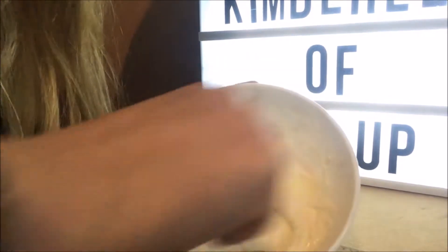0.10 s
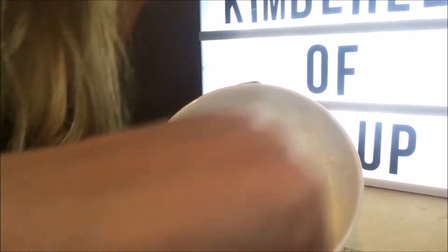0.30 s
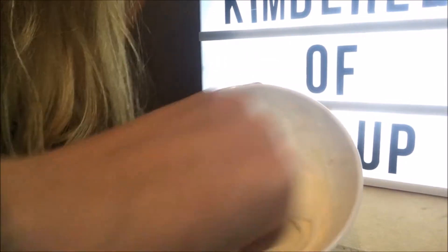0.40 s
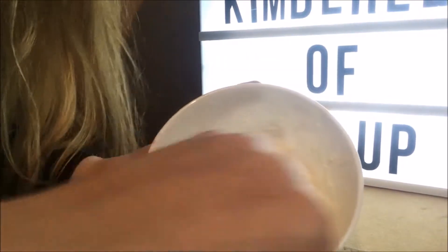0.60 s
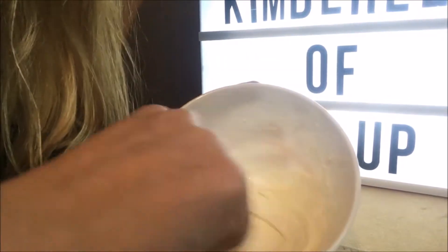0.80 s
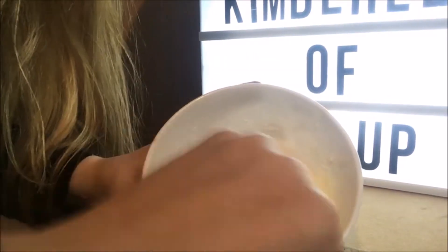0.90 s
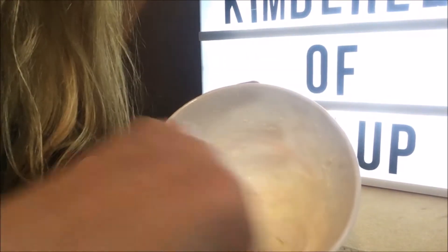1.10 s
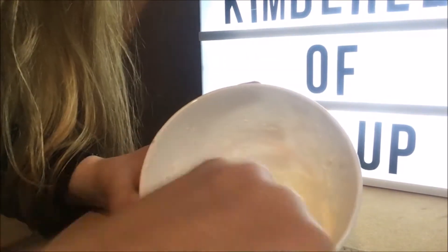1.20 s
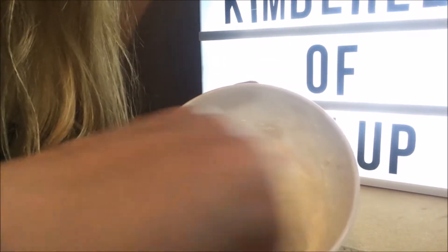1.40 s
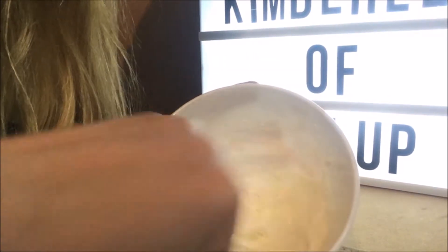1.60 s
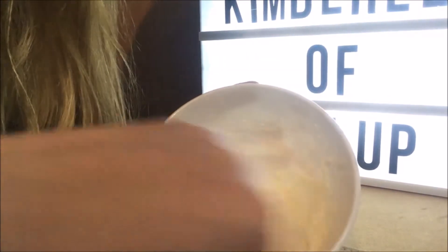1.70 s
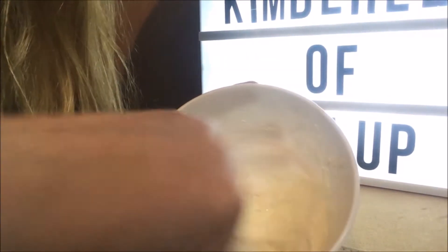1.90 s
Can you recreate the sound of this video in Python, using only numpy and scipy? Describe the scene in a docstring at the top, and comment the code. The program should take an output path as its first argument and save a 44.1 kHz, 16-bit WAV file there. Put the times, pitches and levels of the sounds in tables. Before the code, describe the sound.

A hand works thick gooey paste near the microphone, with irregular wet pops and squelches for just over a second, then only faint sticky clicks and tiny high tinks over low room noise.

```python
"""A small room, microphone close to a plastic bowl in which a hand kneads thick wet slime.
Trapped air pockets burst as wet pops: a cavity resonance with a crack and a ragged noise snap.
Air squeezes through the paste in short fizzing squelches, made of random grains through resonances.
The bowl bumps softly on the table as falling sine tones; sticky ticks of resonant noise and
faint high tinks of ringing modes fill the pauses, over quiet filtered room noise."""
import sys
import numpy as np
from scipy import signal
from scipy.fft import rfft, irfft, next_fast_len
from scipy.io import wavfile
from scipy.ndimage import map_coordinates

SR = 44100
rng = np.random.default_rng(int(sys.argv[2]) if len(sys.argv) > 2 else 0)


def put_to_file(sound):
    """Save the sound as 16-bit audio at rate SR, in the file named by the first command-line argument."""
    columns = np.atleast_2d(sound).T  # one column per channel
    safe = np.clip(columns, -1, 1)
    whole_steps = np.round(safe * 32767)
    wavfile.write(sys.argv[1], SR, whole_steps.astype(np.int16))


N = 85995  # length of the scene in samples
SIZE = 16384  # length of one short sound in samples
HZ = np.fft.rfftfreq(SIZE, 1 / SR)
T = np.arange(SIZE) / SR


def amp(db):
    """Decibels to gain."""
    return 10 ** (np.asarray(db) / 20)


def unit(x):
    """Scaled to rms 1."""
    return x / np.sqrt(np.mean(x ** 2) + 1e-20)


def peaked(x, db):
    """Scaled to a peak level in dB."""
    return amp(db) * x / np.abs(x).max()


def along(points, hz):
    """(Hz, value) points read on a log frequency axis."""
    f, v = np.transpose(points)
    return np.interp(np.log(hz + 1), np.log(f + 1), v)


def fade(t, t60):
    """Exponential decay, falling 60 dB in t60 seconds."""
    return np.exp(-np.log(1000) * t / np.maximum(t60, 1e-4))


def resonance(f, hz, q):
    """Complex response of one resonance at hz, with gain 1 at its centre."""
    return 1j * f * hz / q / (hz * hz - f * f + 1j * f * hz / q)


def filtered(x, response):
    """x times a response of frequency, padded so that its end does not wrap round."""
    m = next_fast_len(len(x) + SR // 2)
    hz = np.fft.rfftfreq(m, 1 / SR)
    return irfft(rfft(x, m) * response(hz), m)[:len(x)]


def causal(gain):
    """The spectrum of the most abrupt (minimum-phase) pulse with this gain."""
    cepstrum = irfft(np.log(np.maximum(gain, 1e-6)))
    cepstrum[1:SIZE // 2] *= 2
    cepstrum[SIZE // 2 + 1:] = 0
    return np.exp(rfft(cepstrum))


def add(track, s, x):
    """Mix x into the track at s seconds."""
    part = track[max(round(s * SR), 0):][:len(x)]
    part += x[:len(part)]


def in_room(x):
    """A short sound with a small-room tail: noise whose decay time and colour depend on frequency."""
    # Decay of the room. Each row: frequency in Hz, t60 in seconds.
    room_t60 = [(150, 0.089), (1200, 0.16), (4000, 0.2), (12000, 0.063)]
    # Colour of the tail. Each row: frequency in Hz, relative level in dB.
    room_colour = [(100, -14), (500, -3.5), (1300, -2), (4000, -8.5), (12000, 1.5)]
    tail_db, gap_s = -12, 0.001  # tail re direct sound; delay at which it is half risen
    hz, t, z = signal.stft(rng.standard_normal(SIZE), SR, nperseg=256)
    decay = fade(t, along(room_t60, hz)[:, None])
    shape = decay * amp(along(room_colour, hz))[:, None]
    tail = signal.istft(z * shape, SR, nperseg=256)[1][:SIZE]
    tail = tail * np.clip(T / gap_s - .5, 0, 1)
    return x + amp(tail_db) * signal.fftconvolve(x, tail / np.linalg.norm(tail))[:SIZE]


def room_noise():
    """The quiet background of the room: coloured noise that wavers a little in level."""
    # Spectrum of the room noise. Each row: frequency in Hz, relative level in dB per Hz.
    floor_colour = [(20, -11), (45, 9), (75, 1.5), (150, -3.5), (330, -8.5), (560, -8), (720, -17),
                    (1100, -10.5), (1750, -20), (3200, -16.5), (5000, -23), (8500, -19), (15500, -25)]
    # Course of the room noise. Each row: time in seconds, level in dB before the waver.
    floor_level = [(0, -61.5), (.4, -62.5), (1.0, -63.5), (1.3, -70), (1.55, -69), (1.95, -70.5)]
    waver_db, wavers_per_s = 0.6, 12.83  # scale of the random level points, and their rate
    t = np.arange(N) / SR
    waver = map_coordinates(rng.standard_normal(SIZE), [t * wavers_per_s])
    level_db = np.interp(t, *np.transpose(floor_level)) + waver_db * waver
    hiss = filtered(rng.standard_normal(N), lambda hz: amp(along(floor_colour, hz)))
    return amp(level_db) * unit(hiss)


def squelches():
    """A rush of minute bursts rings the big cavity (gurgle), the small ones (spit) and air channels (fizz)."""
    # Air squeezed through the paste. Each row: start in seconds, swell in seconds, hold in seconds,
    # t60 in seconds, gurgle pitch in Hz, then gurgle, spit and fizz rms in dB before the swell and decay.
    squeezes = [(0.053, .004, 0.0047, 0.019, 930, -48.5, -61.5, -57.5),
                (0.192, 0.00084, .012, 0.075, 990, -69, -70, -49.5),
                (0.204, 0.0013, 0.0038, 0.15, 1110, -44, -49, -55.5),
                (0.266, .008, 0.0049, 0.038, 1090, -68, -56.5, -72.5),
                (0.522, 0.00426, 0.0057, 0.08, 1310, -44, -48.5, -43.5),
                (0.573, .01, 0.013, 0.048, 1200, -62, -55.5, -86),
                (0.81, 0.0037, 0.0081, 0.046, 1260, -57, -67, -47.5),
                (0.821, .009, 0.012, 0.034, 1170, -43, -44, -36),
                (0.845, .002, 0.0079, 0.016, 1120, -45.5, -61, -47),
                (0.857, .006, .008, .05, 1250, -50, -75, -58.5),
                (0.947, .018, .008, 0.062, 770, -55, -84, -87),
                (1.096, .006, 0.0081, 0.069, 1010, -47, -49.5, -39.5),
                (1.143, .006, .014, 0.16, 1300, -52.5, -64, -73.5),
                (1.619, .022, 0.021, 0.17, 1300, -52, -61.5, -58.5),
                (1.675, .008, 0.015, 0.12, 680, -45, -44, -53.5),
                (1.931, .015, 0.0069, .12, 930, -55, -67, -54)]
    # Colour of the big cavity. Each row: frequency in Hz, gain in dB.
    gurgle_colour = [(100, -1.5), (300, -4), (430, -8.5), (570, 2), (700, -10.5), (900, -2.5), (1300, -6),
                     (1750, -14.5), (2300, -14), (3000, -22), (6000, -39)]
    # Colour of the small cavities. Each row: frequency in Hz, gain in dB.
    spit_colour = [(900, -23.5), (1800, -16.5), (2300, -2.5), (2550, -2.5), (2950, 5.5), (3300, -1),
                   (4100, 1), (4800, -10.5), (5600, -15.5), (7000, -7), (10000, -29)]
    # Narrow air channels. Each row: frequency in Hz, width in Hz, gain in dB.
    fizz_channels = [(7050, 550, -1.5), (9980, 210, -5.5), (11290, 230, 2), (12550, 380, -0.5),
                     (14350, 180, -8)]
    # Broad fizz under the channels. Each row: frequency in Hz, gain in dB.
    fizz_bed = [(3000, -67), (5500, -11), (9000, -18), (15500, -7.5)]
    grains_per_s, gurgle_q = 4000, 1.5  # grains on average
    clump_db, clumps_per_s = 3, 450  # the flow sputters by about this much either way
    out = np.zeros(N)
    channels = sum(np.abs(resonance(HZ, hz, hz / width) * amp(db)) ** 2
                   for hz, width, db in fizz_channels)
    spit = causal(amp(along(spit_colour, HZ)))
    fizz = causal(np.sqrt(channels + amp(along(fizz_bed, HZ)) ** 2))
    for s, swell, hold, t60, hz, *levels in squeezes:
        gurgle = causal(amp(along(gurgle_colour, HZ))) * resonance(HZ, hz, gurgle_q)
        sputter = map_coordinates(rng.uniform(-1, 1, SIZE), [T * clumps_per_s])
        sizes = rng.standard_normal(SIZE) * amp(clump_db * sputter)
        grains = rfft(sizes * (rng.random(SIZE) < grains_per_s / SR))
        rise = np.minimum(T / max(swell, 1e-4), 1)
        flow = rise * fade(np.maximum(T - swell - hold, 0), t60)
        rush = sum(amp(db) * unit(irfft(grains * cavity))
                   for db, cavity in zip(levels, (gurgle, spit, fizz)))
        add(out, s, in_room(flow * rush))
    return out


def pops():
    """A pocket tears open with a ragged snap and a crack; its cavity rings a few cycles, sliding downwards."""
    # Bursting air pockets. Each row: start in seconds, peak in dB before the room tail, cavity pitch in Hz,
    # crack gain in dB, crack centre in Hz, snap gain in dB, snap centre in Hz;
    # both gains are relative to the cavity, before the colours below.
    pockets = [(0.0534, -41, 920, -23, 2200, -23, 7050), (0.0587, -38, 1030, -14, 3530, -2, 7200),
               (0.08, -53, 1010, -10, 2500, -24, 7000), (0.0877, -50.5, 970, -18, 2200, -30, 7000),
               (0.1467, -33, 710, -18, 2200, -23, 4700), (0.1586, -40, 1010, -2.5, 2240, -11.5, 5000),
               (0.2065, -20.5, 1120, -2.5, 2570, -16.5, 8000), (0.2355, -31.5, 1150, -9, 1930, -30, 9000),
               (.4341, -25, 910, -13, 2700, -29.5, 6130), (0.5007, -34, 835, -23, 2200, -20, 8900),
               (0.5212, -10, 1200, -7, 3300, -22, 10800), (.6790, -42, 940, -15, 2520, -10.5, 7100),
               (0.7114, -45, 1140, -8, 3300, -11, 7000), (.7960, -29.5, 1390, 7, 3200, -12, 9000),
               (0.8081, -16.5, 1200, -8, 4120, -18, 6940), (0.8443, -22, 1140, -10, 3400, -7, 11560),
               (0.8545, -45, 1250, -5.5, 3300, -9, 12000), (0.867, -38.5, 1240, -25, 2300, -32, 10000),
               (.9680, -52, 860, -22, 2220, -25, 7040), (1.0786, -30, 1330, -6, 2900, -9, 7860),
               (1.0962, -17.5, 1060, -3, 3190, -13.5, 12000),
               (1.1426, -14.5, 1230, -4.5, 2270, -12.5, 5130), (1.2161, -46.5, 1100, -13, 2220, -19, 6900),
               (1.2431, -42, 1076, -9, 2530, -8.5, 5960), (1.35, -49.5, 870, -16.5, 2230, -26, 7000),
               (1.4010, -34, 1400, -3, 2070, -12, 7850), (1.4229, -44.5, 1274, -6, 2570, -18.5, 7240),
               (1.5160, -46.5, 1250, -5, 2690, -13, 7140), (1.585, -37, 680, -34.5, 1860, -53, 7000),
               (1.7900, -43, 1050, -10, 3540, -12, 6000), (1.9096, -33.5, 870, -22.5, 2250, -34, 8000)]
    # Colour of the cavity. Each row: frequency in Hz, gain in dB.
    body_colour = [(60, -8), (220, -9.5), (360, -12), (560, 2.5), (720, -6.5), (900, 3), (1400, 0.5),
                   (1750, -11.5), (2300, -16.5), (4500, -27.5), (15000, -36)]
    # Colour of the crack. Each row: frequency in Hz, gain in dB.
    crack_colour = [(500, -26), (1300, 9), (1750, 3.5), (2200, 2), (2500, 2.5), (2800, -7.5), (3250, 0.5),
                    (4000, -3), (4700, -7), (6000, -8.5), (9000, -8.5), (15000, -43)]
    # Colour of the snap. Each row: frequency in Hz, gain in dB.
    snap_colour = [(2000, -21), (4500, 1), (8000, 0.5), (12000, -4.5), (15500, -0.5)]
    cavity_q, crack_q, snap_q, tear_t60_s = 2.07, 2.1, 2.57, 0.0076
    smear_cycles = .35  # low notes arrive late, by up to this many of their own cycles
    out = np.zeros(N)
    smear = np.exp(-2j * np.pi * smear_cycles * np.log(1 + HZ / 100))
    for s, db, hz, crack_db, crack_hz, snap_db, snap_hz in pockets:
        cavity = np.abs(resonance(HZ, hz, cavity_q)) * amp(along(body_colour, HZ))
        crack = np.abs(resonance(HZ, crack_hz, crack_q)) * amp(crack_db + along(crack_colour, HZ))
        snap = np.abs(resonance(HZ, snap_hz, snap_q)) * amp(snap_db + along(snap_colour, HZ))
        tear = rng.standard_normal(SIZE) * fade(T, tear_t60_s)
        ragged_snap = causal(snap) * rfft(tear / np.linalg.norm(tear))
        burst = causal(np.hypot(cavity, crack)) + ragged_snap
        add(out, s, in_room(peaked(irfft(burst * smear), db)))
    return out


def thumps():
    """The bowl bumps the table: each decaying tone falls quickly in pitch to its lowest note."""
    # Bumps of the bowl. Each row: start in seconds, peak in dB, t60 in seconds, final pitch in Hz.
    bumps = [(0.057, -58.5, 0.081, 82.4), (0.148, -51.5, .13, 48), (0.208, -45.5, 0.22, 61),
             (0.238, -42.5, 0.15, 73.4), (.296, -46, 0.1, 50), (0.438, -51.5, 0.16, 53),
             (.523, -40.5, 0.27, 71), (0.549, -49, 0.22, 75.4), (.604, -45.5, 0.082, 51),
             (.810, -43, 0.12, 50.7), (0.926, -45, 0.11, 51.5), (1.095, -44.5, 0.13, 51),
             (1.139, -47.5, 0.058, 54), (1.212, -52.5, 0.079, 55), (1.354, -58, 0.097, 66.6),
             (1.588, -52, 0.071, 56), (1.697, -58, 0.059, 91.5), (1.909, -51.5, 0.11, 48)]
    start_hz, sag_s, attack_s = 217, 0.0073, 0.0039  # both times are exponential time constants
    out = np.zeros(N)
    for s, db, t60, end_hz in bumps:
        pitch = end_hz + (start_hz - end_hz) * np.exp(-T / sag_s)
        turns = np.cumsum(pitch) / SR
        envelope = (1 - np.exp(-T / attack_s)) * fade(T, t60)
        add(out, s, peaked(np.sin(2 * np.pi * turns) * envelope, db))
    return out


def tick(db, hz):
    """One tiny bright snap of a strand: a short noise burst through one broad resonance."""
    tear = rng.standard_normal(SIZE) * fade(T, 0.0092)  # t60 in seconds
    return peaked(irfft(rfft(tear) * resonance(HZ, hz, 1.5)), db)


def ticks():
    """Sticky strands let go in clear ticks, over a faint random crackle of the paste."""
    # Strands letting go. Each row: start in seconds, peak in dB before the room tail, centre in Hz.
    strands = [(.0735, -47, 7600), (.1665, -42, 13100), (0.1945, -35, 12500), (0.2139, -33, 12000),
               (.2305, -46, 5000), (.3615, -45, 9100), (.4630, -43.5, 4800), (.4965, -33.5, 9600),
               (.5430, -32, 4930), (.5905, -37, 4200), (.6163, -38, 5540), (.6984, -36, 6600),
               (.7652, -45, 10000), (.7815, -44, 8500), (.8153, -35, 13500), (0.821, -33, 3000),
               (.8865, -56, 13000), (.9218, -42, 9100), (.9385, -47, 10000), (1.3590, -52.5, 6700),
               (1.4410, -61, 6060), (1.6215, -39.5, 4100), (1.6375, -37.5, 5500), (1.6480, -35, 3950),
               (1.6740, -38.5, 6750), (1.6895, -45, 2950), (0.28, -47, 3500), (0.582, -47, 6500),
               (1.7020, -40, 3620), (1.7350, -49, 4970), (1.7807, -51, 11000), (1.7905, -46, 12500),
               (1.8180, -51, 11000), (1.8697, -43.5, 9000), (1.9430, -46, 6500)]
    crackles_per_s, crackle_db, spread_db, crackle_hz = 20, -61, 8, 5730  # middle level and pitch
    out = np.zeros(N)
    for s, db, hz in strands:
        add(out, s, in_room(tick(db, hz)))
    for k in range(int(crackles_per_s * N / SR)):
        size, pitch = rng.standard_normal(2)
        db = crackle_db + spread_db * min(size, 2)  # caps the loudest
        add(out, rng.uniform(0, N / SR), tick(db, crackle_hz * np.exp(.6 * pitch)))
    return out


def tink_mode(hz, t60):
    """One decaying mode, detuned at random by a fraction of a percent."""
    return np.sin(2 * np.pi * hz * T * (1 + 0.0041 * rng.standard_normal())) * fade(T, t60)


def tinks():
    """Faint, perhaps of jewellery: one high mode rings with varying side modes and a tick of contact."""
    # Tinks. Each row: start in seconds, ring peak in dB, side modes in dB re the main mode.
    touches = [(.074, -58, 4), (.298, -50.5, -8), (.648, -46, -7), (1.001, -50, -12), (1.05, -46, 7),
               (1.063, -47, 4), (1.2747, -46, -15), (1.3138, -47.5, 0), (1.345, -59.5, -4),
               (1.6106, -43.5, -8), (1.8895, -50, -1), (1.904, -52.5, -2)]
    # Side modes. Each row: nominal pitch in Hz, level in dB added to the tink's own, t60 in seconds.
    side_modes = [(7320, 4.5, 0.03), (9900, -3.5, .05)]
    main_hz, main_t60_s, attack_s = 8580, 0.072, 0.0002  # nominal pitch; attack time constant
    touch_db, touch_hz = 2, 12500  # tick of the contact, level re the ring
    out = np.zeros(N)
    for s, db, side_db in touches:
        ring = tink_mode(main_hz, main_t60_s)
        for hz, level, t60 in side_modes:
            ring += amp(side_db + level + rng.normal(0, 3.1)) * tink_mode(hz, t60)
        ring = peaked(ring * (1 - np.exp(-T / attack_s)), db)
        add(out, s, ring + tick(db + touch_db, touch_hz))
    return out


def scene():
    """All sources at one microphone."""
    return (room_noise() + squelches() + pops() + thumps() + ticks() + tinks())[None]


def record(dry):
    """The recorder keeps nothing from its band limit of 15950 Hz upwards."""
    return np.array([filtered(x, lambda hz: hz < 15950) for x in dry])


dry = scene()
out = record(dry)
put_to_file(out)
```